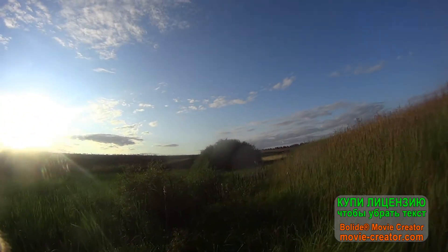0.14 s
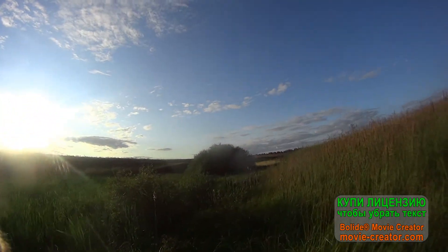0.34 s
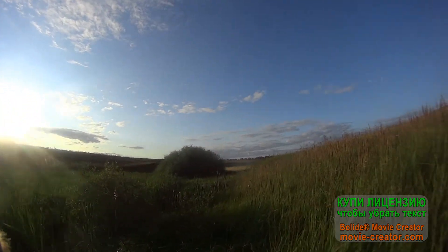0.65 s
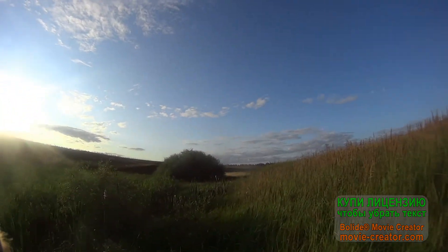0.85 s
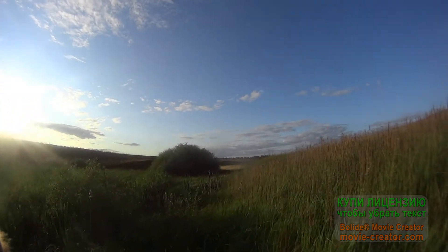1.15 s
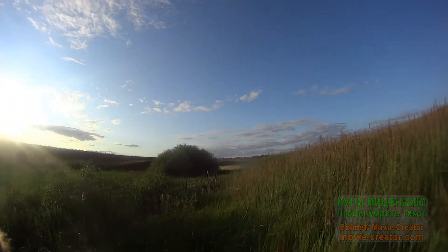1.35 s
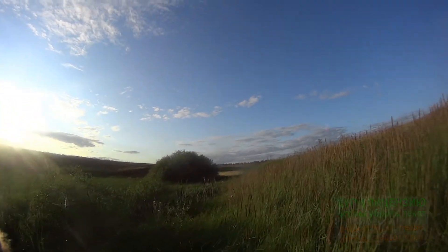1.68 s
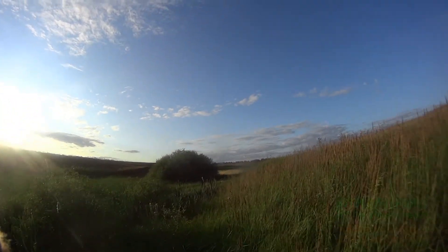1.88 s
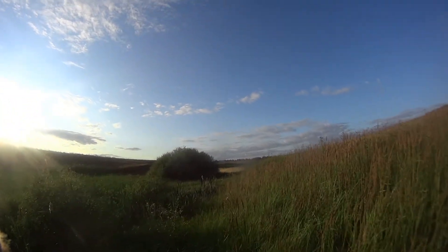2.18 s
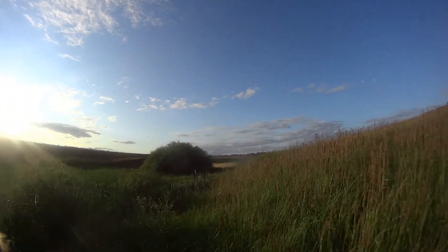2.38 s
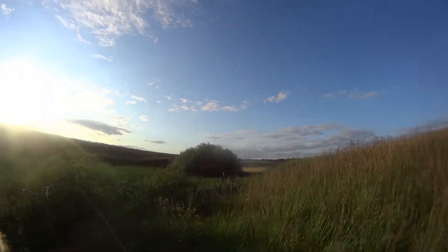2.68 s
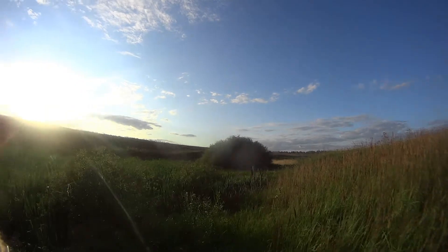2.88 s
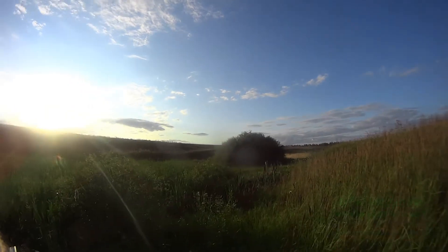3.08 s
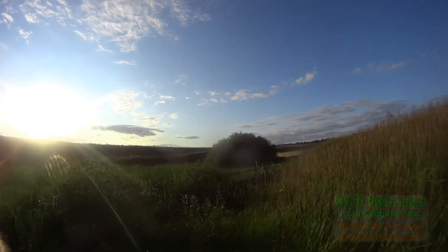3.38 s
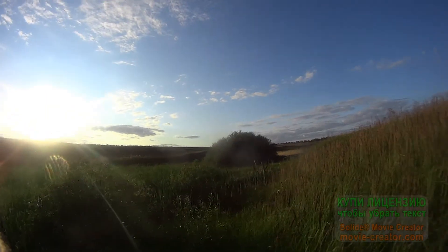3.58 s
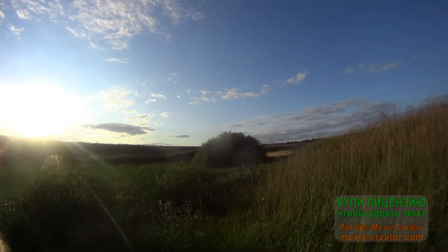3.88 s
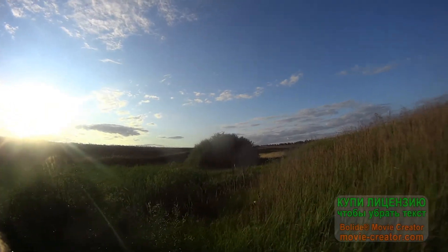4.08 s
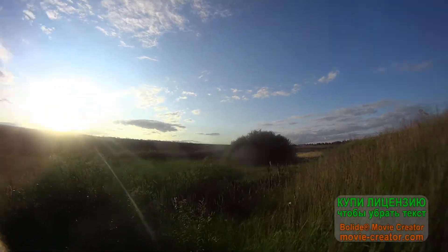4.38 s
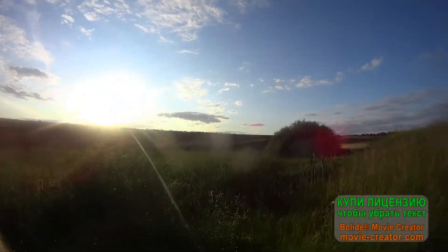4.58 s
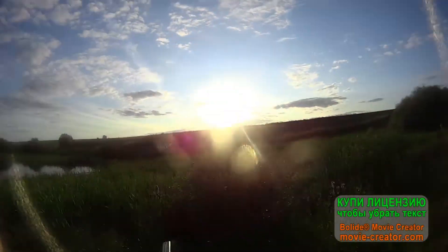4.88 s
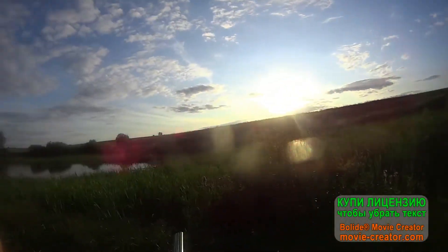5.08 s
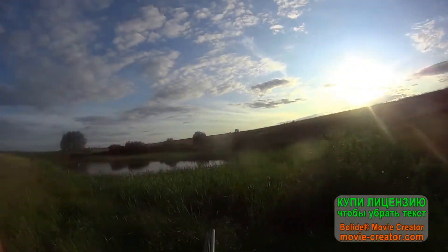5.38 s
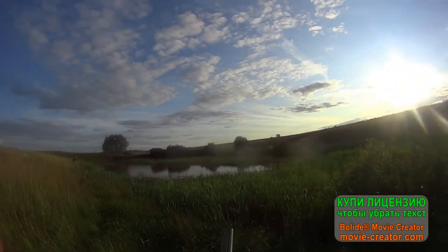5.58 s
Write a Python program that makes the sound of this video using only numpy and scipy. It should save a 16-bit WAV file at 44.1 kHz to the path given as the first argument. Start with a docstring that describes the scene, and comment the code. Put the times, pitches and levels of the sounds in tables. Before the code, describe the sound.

Tall grass brushes right against the stereo microphone of a slowly carried camera, in dry, raspy swishes about once a second. Stalks crackle dully and small stems snap, with soft, low thuds of steps underneath. Late on, one sharp, hollow knock hits the camera housing with a brief rattle, followed by another swish and a few light taps. A faint hiss of insects and air lies over the open meadow.

```python
"""Tall grass beside a pond, evening, heard from the stereo microphone of a slowly carried camera.
Right at the microphone, stalks brush past about once a second in dry, raspy swishes; thicker ones
crackle as they bend, and stems snap. Soft steps thud through the camera, its housing rattles lightly,
and one knock sets it ringing. Farther off, a faint hiss of insects and air lies over the meadow."""
import sys
import numpy as np
from scipy.fft import rfft, irfft, next_fast_len
from scipy.io import wavfile
from scipy.ndimage import map_coordinates

SR = 44100
rng = np.random.default_rng(int(sys.argv[2]) if len(sys.argv) > 2 else 0)


def waveform_to_disk(signal):
    """Save audio, clipped to [-1, 1], as 16-bit WAV at the path in sys.argv[1]."""
    frames = np.transpose(np.atleast_2d(signal))
    scaled = np.clip(frames, -1, 1) * 32767
    samples = np.round(scaled).astype(np.int16)
    wavfile.write(sys.argv[1], SR, samples)


N = 253373

# Levels in the tables are relative; each source adds its own gain.
# distant insects and air: (frequency [Hz], level [dB])
MEADOW_SPECTRUM = [(40, 4), (90, -1), (230, -2), (450, 2.5), (800, 1), (1020, 1.5), (1230, -7),
                   (1450, -5.5), (2000, -2.5), (2900, -18.5), (4200, -4), (5250, -20), (6300, -10.5),
                   (8200, -2), (11000, -21)]
# jolts of the camera: (time [s], length [s], level [dB])
JOLTS = [(0.07, .015, -58), (0.54, 0.078, -68), (0.84, .05, -50), (1.625, .02, -58), (1.93, 0.053, -66.5),
         (2.64, 0.093, -53.5), (3.44, 0.09, -63.5), (4.45, 0.042, -39), (5.15, .07, -58)]
# their thud at the microphone: (frequency [Hz], level [dB])
JOLT_SPECTRUM = [(10, -7.5), (22, 2), (45, -5.5), (85, -15), (150, -16), (400, -23), (1000, -88)]
# light taps on the housing: (time [s], level [dB])
TAPS = [(2.634, -36), (2.641, -39), (4.314, -47), (4.4378, -21.5), (4.4398, -17.5), (4.448, -15.5),
        (4.4595, -41), (4.465, -35), (4.472, -29), (4.4955, -28), (5.056, -36), (5.254, -38.5),
        (5.333, -38)]
# their rattle: (frequency [Hz], level [dB])
TAP_SPECTRUM = [(100, -13.5), (400, -2), (650, 5), (1000, -4), (1450, 7), (2100, -14.5), (2750, -3.5),
                (3600, -64), (8000, -50)]
# the blow on the housing: (time [s], level [dB])
KNOCK = [(4.4551, -15.5)]
# ringing of the housing: (frequency [Hz], level [dB], t60 [s])
HOUSING_MODES = [(280, -22, 0.104), (310, -2, 0.049), (590, 0, 0.015), (662, -10, 0.055), (760, -8, 0.006),
                 (785, -7, 0.024), (973, -6, 0.049), (1097, -3, 0.02), (1180, -11, 0.032),
                 (1540, -16, 0.011), (1885, -15, 0.026)]
# the camera swaying on its mount: (frequency [Hz], level [dB], t60 [s])
MOUNT_MODES = [(21.6, -25, 0.51), (60.4, -13, 0.11), (231, -2, 0.046)]
# a small shell gives little bass, a blunt contact little treble: (frequency [Hz], level [dB])
SHELL_SPECTRUM = [(30, -27), (150, 5), (240, -1.5), (480, 5), (950, 5), (1200, 0.5), (1480, 0),
                  (2100, 5.5), (3500, -24), (8000, -16)]
# fine scraping as the camera swings round: (time [s], level [dB])
SIZZLE_LEVELS = [(4.7, -75), (4.96, -57), (5.09, -46), (5.2, -58), (5.42, -61), (5.6, -61)]
# its thin, high band: (frequency [Hz], level [dB])
SIZZLE_SPECTRUM = [(3800, -35), (4900, -22), (5400, -4), (5800, 0), (6300, -34), (7500, -41)]
# stalks pressed down: (time [s], length [s], level [dB])
PRESSES = [(0.03, 0.13, -57), (0.52, 0.51, -53), (1.5, 0.29, -52.3), (2.4, 0.34, -57), (2.84, 0.043, -54),
           (3.5, .21, -56.5), (4.2, 0.33, -55), (5.0, .1, -54.5)]
# their dull crackle: (frequency [Hz], level [dB])
STALK_SPECTRUM = [(500, -15.5), (900, -8.5), (1080, -5.5), (1190, -1), (1300, -1), (1440, -9), (1620, -5),
                  (1950, -12.5), (2250, -8), (2420, -13), (2900, -3.5), (5000, -19.5)]
# stems snapping close by: (time [s], level [dB])
SNAPS = [(0.502, -31), (0.777, -26), (0.885, -30), (1.522, -25), (1.534, -32), (1.543, -32), (2.7252, -33),
         (3.495, -25.5), (3.6155, -30), (3.663, -35.5), (3.8838, -36), (4.393, -28), (5.3268, -33)]
# their bright crack: (frequency [Hz], level [dB])
SNAP_SPECTRUM = [(1000, -24), (2200, -11), (2900, -1), (3900, -1.5), (5200, 0), (6200, -8), (8200, -7),
                 (11000, -16)]
# sweeps through the grass: (full contact [s], peak [s], letting go [s], attack [s], level [dB],
# swell [dB], ease [dB], brightness [dB], left minus right [dB])
SWEEPS = [(0.0, 0.24, 0.32, .05, -46, 1.5, 1, 0.8, 0), (0.322, 0.335, 0.365, 0.062, -44, 7, 2.5, 4.5, 1),
          (0.443, 0.58, 0.89, 0.12, -34.5, 3.5, 4, 0.3, -1.5),
          (0.89, 0.895, 0.96, .04, -44.5, 6, 4, -2.5, -1),
          (1.339, 1.53, 1.817, 0.028, -36.5, 9, 8.5, 0.9, -2.2),
          (2.303, 2.58, 2.603, 0.087, -38, 5.5, 1, 1, -2), (2.7, 2.725, 2.7, .05, -50, 0, -3, 0, -1.5),
          (2.83, 2.86, 2.91, 0.056, -48.5, -0.5, -1.5, -10, 2),
          (3.165, 3.3, 3.57, 0.14, -42, 6, -0.5, 2.2, -2), (3.47, 3.495, 3.52, 0.14, -41, 1.5, 0.5, -1, -1),
          (3.92, 3.972, 3.99, 0.045, -55.5, 1, 2, 9, 1),
          (4.146, 4.41, 4.5, 0.078, -37, 4.5, 1.5, 0.6, -1.5),
          (4.72, 4.83, 5, 0.086, -50.5, 0, 3.5, 1.5, -3),
          (5.051, 5.099, 5.12, .13, -35.5, 3, 2.5, -0.2, -4),
          (5.389, 5.396, 5.44, 0.058, -50, -2, 0, -1, 0)]
# blades scraping at the microphone: (frequency [Hz], level [dB])
RASP_SPECTRUM = [(900, -45), (2100, -19), (2400, -13), (2750, -1), (3000, 0), (3350, -4.5), (4000, -6.5),
                 (5000, 0), (5350, -.3), (5850, -8.5), (6600, -3.5), (7250, -7.5), (8000, -1.8),
                 (9900, -8.5), (11000, -18)]
# likeness of the sound at the two microphone ports: (frequency [Hz], correlation [0..1])
PORT_LIKENESS = [(40, 0.65), (400, 0.72), (1300, 0.8), (3000, 0.82), (10000, 0.74)]
# phase between the ports: (frequency [Hz], lead of the left [rad])
PORT_LEAD = [(100, 0), (200, -.7), (400, -1.7), (850, -2.3), (1200, -1.6), (1890, -1.7), (2300, -.5),
             (3100, -.9), (4300, -.15), (6200, -.4), (7000, -.15), (11000, 0)]


def amp(db):
    """Decibels to gain."""
    return 10 ** (np.asarray(db) / 20)


def unit(x):
    """x at rms 1."""
    return x / np.sqrt(np.mean(x ** 2) + 1e-20)


def along(points, hz):
    """(frequency, value) points read on a log axis."""
    f, v = np.transpose(points)
    return np.interp(np.log(hz + 1), np.log(f + 1), v)


def wobble(rate):
    """A smooth random curve, rate knots a second."""
    knots = rng.standard_normal(int(N * rate / SR) + 4)
    return map_coordinates(knots, [np.arange(N) * rate / SR])


def filtered(x, response):
    """x through a complex frequency response."""
    m = next_fast_len(N + SR // 2)
    return irfft(rfft(x, m) * response(np.fft.rfftfreq(m, 1 / SR)), m)[..., :N]


def coloured(x, spectrum):
    """x through a causal, minimum-phase filter with the gain of the spectrum."""
    m = 2 * next_fast_len(N)
    gain = amp(along(spectrum, np.fft.rfftfreq(m, 1 / SR)))
    cepstrum = irfft(np.log(gain + 1e-6))
    cepstrum[1:m // 2] *= 2
    cepstrum[m // 2 + 1:] = 0
    return irfft(rfft(x, m) * np.exp(rfft(cepstrum)), m)[..., :N]


def spread(pair, spectrum):
    """Two unrelated signals become one coloured, partly alike stereo sound of rms 1."""
    def response(hz):
        angle = np.arccos(along(PORT_LIKENESS, hz)) / 2
        return amp(along(spectrum, hz)) * [np.cos(angle), np.sin(angle)]
    mid, side = filtered(pair, response)
    return unit(np.array([mid + side, mid - side]))


def swell(start, length, rise_db_per_s, fall_db_per_s):
    """Envelope in dB: rises to 0 at the start, holds for the length, then dies away."""
    t = np.arange(N) / SR - start
    return rise_db_per_s * np.minimum(t, 0) - fall_db_per_s * np.maximum(t - length, 0)


def pulses(rows, floor_db, rise_db_per_s, fall_db_per_s):
    """Gain of (time, length, level) swells over a steady floor."""
    power = sum(amp(db + swell(s, length, rise_db_per_s, fall_db_per_s)) ** 2 for s, length, db in rows)
    return np.sqrt(power + amp(floor_db) ** 2)


def slips(rate, scatter_db):
    """Tiny stick-slip impulses of uneven size, rate a second, at rms 1."""
    chance = np.clip(rate / SR, 1e-4, 1)
    sizes = rng.standard_normal((2, N)) * amp(scatter_db * rng.standard_normal((2, N)))
    return unit(sizes * (rng.random((2, N)) < chance) / np.sqrt(chance))


def cracks(rows, spectrum, t60, tail_db, tail_t60):
    """Each event is a sharp burst of noise with a weaker, longer tail."""
    bursts, t = np.zeros(N + SR), np.arange(SR // 10) / SR
    fade = amp(-60 * t / t60) + amp(tail_db - 60 * t / tail_t60)
    for s, db in rows:
        bursts[round(s * SR):][:len(t)] += amp(db) * fade * rng.choice([-1, 1], len(t))
    filter_gain = np.linalg.norm(coloured(np.ones(1), spectrum))
    return coloured(bursts, spectrum) / filter_gain


def ringing(modes, t):
    """Damped sines of a struck body."""
    return sum(amp(db - 60 * t / t60) * np.sin(2 * np.pi * hz * t) for hz, db, t60 in modes)


def meadow(level_db=-57):
    """Far insects and air: an even, faint hiss."""
    return amp(level_db + 0.59 * wobble(2.8)) * spread(rng.standard_normal((2, N)), MEADOW_SPECTRUM)


def rumble(gain_db=-1):
    """Steps and moving air shake the camera and its microphone."""
    shake = pulses(JOLTS, floor_db=-69, rise_db_per_s=550, fall_db_per_s=195)
    return shake * amp(gain_db) * spread(rng.standard_normal((2, N)), JOLT_SPECTRUM)


def housing_taps(gain_db=-2.5):
    """Light taps rattle the shell around the microphone."""
    return amp(gain_db) * cracks(TAPS, TAP_SPECTRUM, t60=0.009, tail_db=-13, tail_t60=0.035)


def knock(ring_attack_s=0.00019, sway_attack_s=0.0015):
    """One blow rings the damped housing, louder at the right port, and sets the camera swaying."""
    ring, sway = np.zeros((2, N))
    for s, db in KNOCK:
        t = np.maximum(np.arange(N) / SR - s, 0)
        ring += amp(db) * ringing(HOUSING_MODES, t) * (1 - np.exp(-t / ring_attack_s)) ** 2
        sway += amp(db) * ringing(MOUNT_MODES, t) * (1 - np.exp(-t / sway_attack_s))
    return coloured(ring, SHELL_SPECTRUM) * amp([[-1], [1]]) - sway


def sizzle():
    """A narrow band of fine scraping swells and fades as the camera swings round."""
    level_db = np.interp(np.arange(N) / SR, *np.transpose(SIZZLE_LEVELS))
    return amp(level_db) * spread(slips(5000, scatter_db=6), SIZZLE_SPECTRUM)


def bending_stalks(gain_db=4):
    """Thicker stalks close by bend with a dull crackle."""
    weight = pulses(PRESSES, floor_db=-59, rise_db_per_s=84, fall_db_per_s=64)
    crackle = slips(1500, scatter_db=1.5) + rng.standard_normal((2, N))
    return weight * amp(gain_db + 1.4 * wobble(29.33)) * spread(crackle, STALK_SPECTRUM)


def snapping_stems(gain_db=0.5):
    """Each stem near the microphone breaks in a brief fracture and a spray of splinters."""
    return amp(gain_db) * cracks(SNAPS, SNAP_SPECTRUM, t60=0.003, tail_db=-11, tail_t60=0.041)


def sweep(start, peak, stop, attack, peak_db, swell_db, ease_db):
    """Power of one sweep: contact builds and eases, then the stalks slip free, swing on and settle."""
    pressure_db = np.interp(np.arange(N) / SR, [start, peak, stop], [-swell_db, 0, -ease_db])
    rise_db_per_s = 18 / attack
    contact_db = swell(start, stop - start, rise_db_per_s, fall_db_per_s=223)
    settle_db = swell(start, stop - start, rise_db_per_s, fall_db_per_s=32) - 7.5
    return amp(peak_db + pressure_db + np.maximum(contact_db, settle_db)) ** 2


def brushing(floor_db=-59.5, flare_db=-15.5):
    """Level, brightness and side of the rasp in dB; colour and side are the average over all sweeps, weighted
    by their power, and fade toward neutral where only the floor remains."""
    powers = np.array([sweep(*row[:-2]) for row in SWEEPS])
    sweep_power = powers.sum(axis=0)
    # the rasp flares round each snap, over a floor of stalks that never quite stop touching
    flares = [(s, 0, db + flare_db) for s, db in SNAPS]
    flare_power = pulses(flares, floor_db, rise_db_per_s=1800, fall_db_per_s=208) ** 2
    bright_db, side_db = np.transpose(SWEEPS)[-2:] @ powers / (sweep_power + amp(floor_db) ** 2)
    return 10 * np.log10(sweep_power + flare_power), bright_db, side_db


def swishes(peak_slips_per_s=4000, slip_share=0.16, brighten_db_per_db=0.0762):
    """Rough blades scrape over each other at the microphone; harder brushing makes more slips."""
    level_db, bright_db, side_db = brushing()
    force_db = level_db - level_db.max()
    grains = slips(peak_slips_per_s * amp(force_db / 2), scatter_db=1)
    scrape = np.sqrt(slip_share) * grains + np.sqrt(1 - slip_share) * rng.standard_normal((2, N))
    rasp = spread(scrape, RASP_SPECTRUM)
    # bright sweeps and harder brushing lift the top and thin the body
    top = filtered(rasp, lambda hz: 1 / (1 + (6400 / (hz + 1)) ** 12))
    body = filtered(rasp, lambda hz: 1 / (1 + (hz / 4000) ** 8))
    tilt_db = bright_db - 0.68 + brighten_db_per_db * force_db
    rasp += (amp(tilt_db) - 1) * top + (amp(-0.62 * tilt_db) - 1) * body
    flutter_db = 0.65 * wobble(110)  # single blades catch and let go
    return amp(level_db + flutter_db + np.array([side_db, -side_db]) / 2) * rasp


def microphone_ports(x):
    """The two ports differ in phase, most of all in the middle range."""
    return filtered(x, lambda hz: np.exp(0.5j * along(PORT_LEAD, hz) * np.array([[1], [-1]])))


def scene():
    """Close grass and handling noise over the distant meadow, in the open air."""
    close = snapping_stems() + housing_taps() + bending_stalks() + sizzle()
    close *= amp([[-1.2], [1.2]])  # a little to the right
    return microphone_ports(close + swishes() + rumble() + meadow() + knock())


def record(dry, top_hz=11050):
    """The camera keeps nothing above its band limit."""
    return filtered(dry, lambda hz: 1 / (1 + (hz / top_hz) ** 400))


dry = scene()
out = record(dry)
waveform_to_disk(out)
```